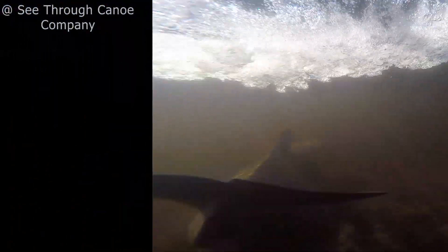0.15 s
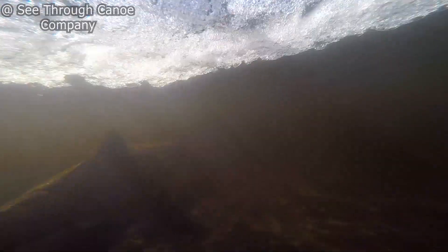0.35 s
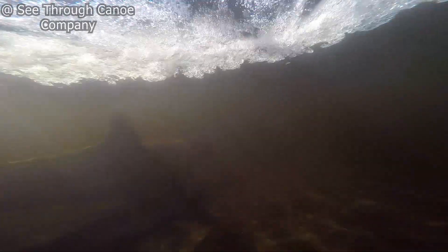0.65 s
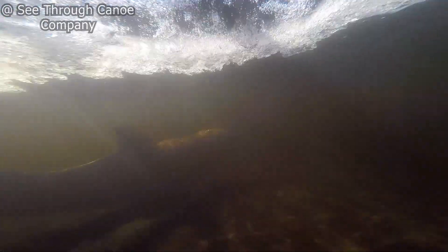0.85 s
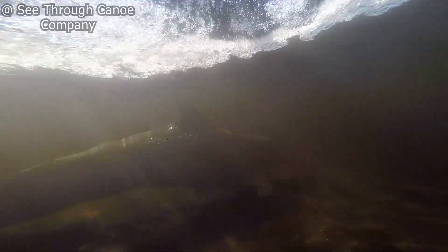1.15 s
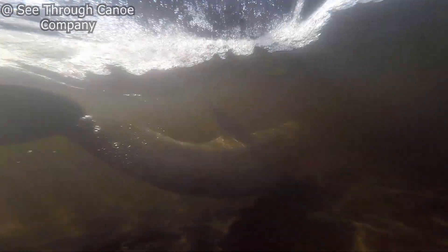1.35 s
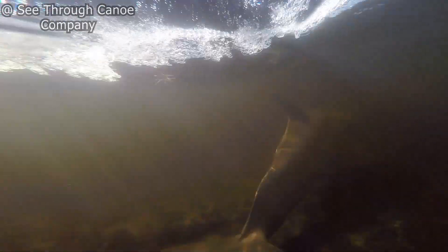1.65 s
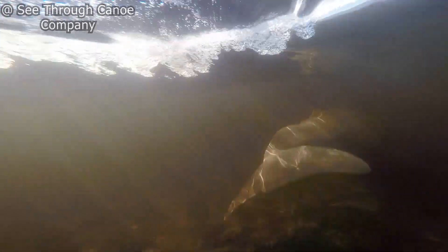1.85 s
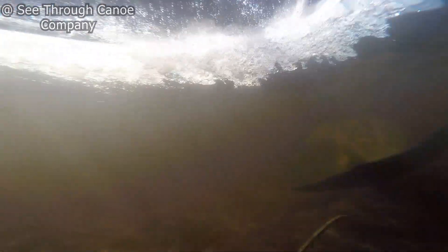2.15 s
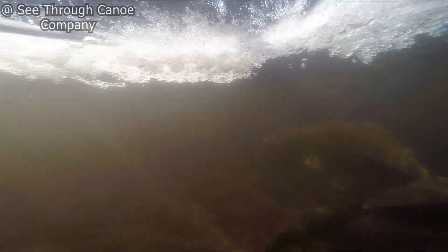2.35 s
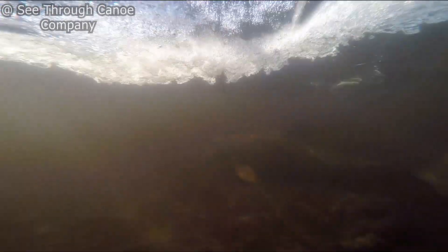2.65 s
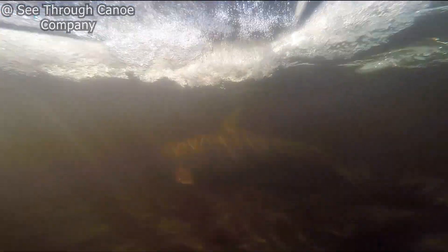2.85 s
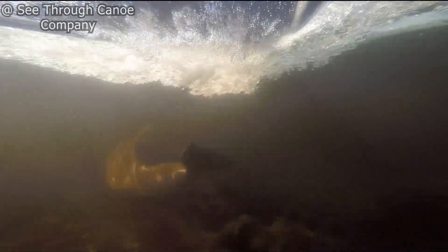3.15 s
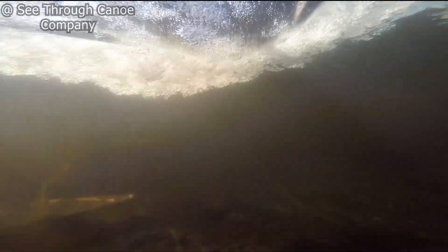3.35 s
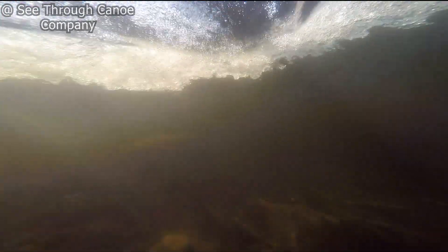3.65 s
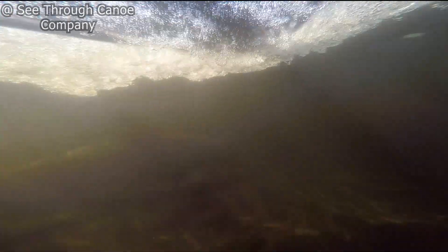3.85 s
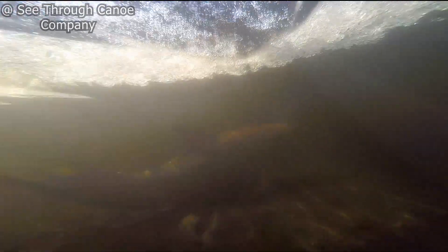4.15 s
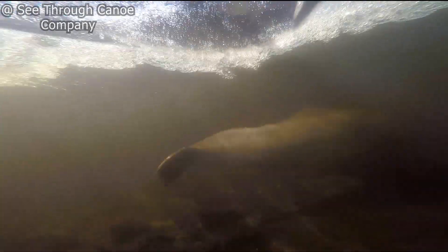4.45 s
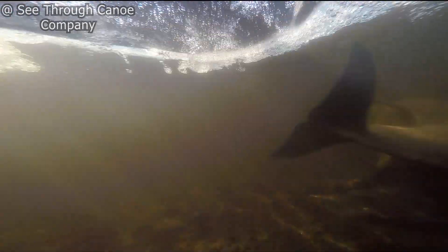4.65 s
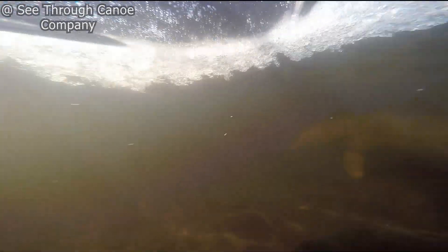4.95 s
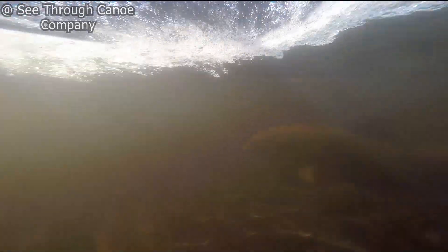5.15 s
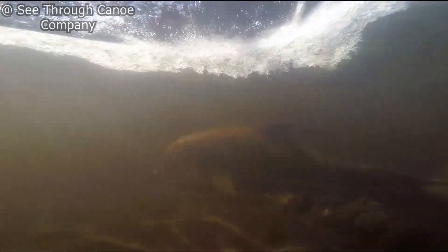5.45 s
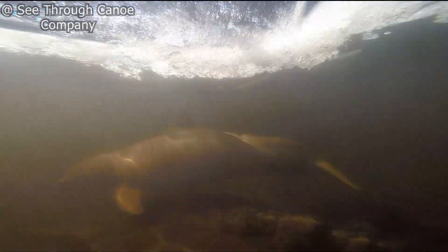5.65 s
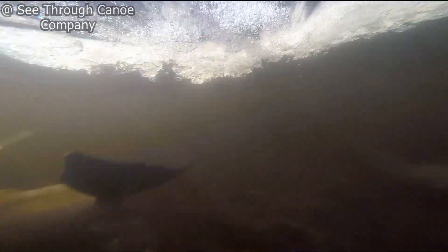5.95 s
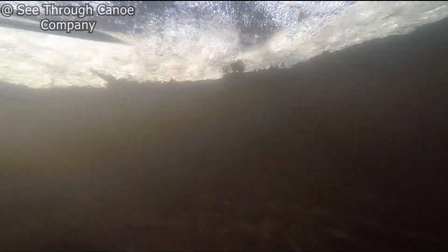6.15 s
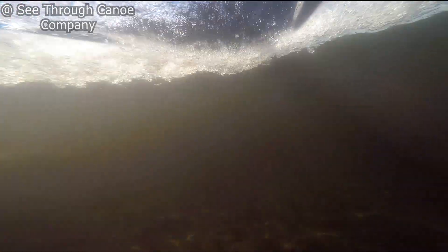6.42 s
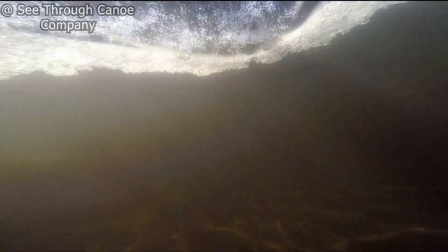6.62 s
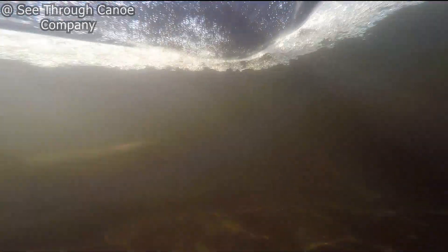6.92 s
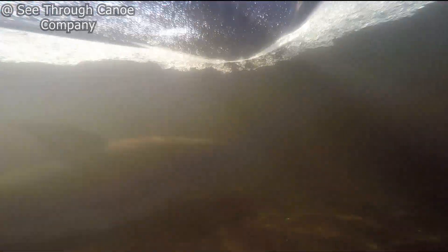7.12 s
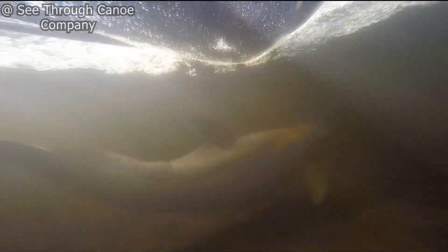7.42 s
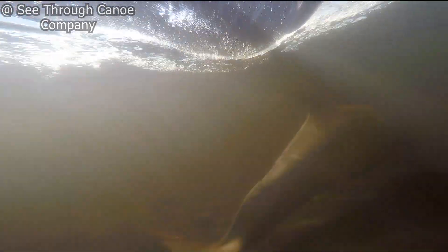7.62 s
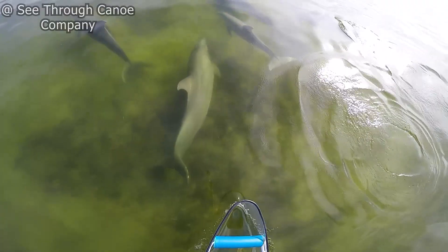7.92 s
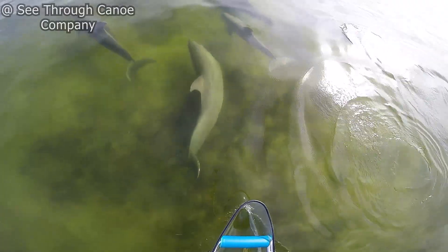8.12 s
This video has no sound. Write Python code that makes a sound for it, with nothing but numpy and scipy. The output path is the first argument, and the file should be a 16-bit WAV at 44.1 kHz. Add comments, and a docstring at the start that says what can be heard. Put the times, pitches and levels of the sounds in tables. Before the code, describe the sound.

Water rushes and bubbles loudly past an underwater hull, with deep drumming, faint gliding dolphin whistles and sharp clicks, then abruptly quiet wind and hiss.

```python
"""Under a moving hull, water rushes past a hard housing: flow drums on it and foam streams by.
Bubbles are short fading tones that ring the housing; rumble and hiss are filtered noise.
Dolphins whistle in gliding tones and snap in sharp clicks.
A moment of the same water at half speed comes first; wind and hiss above the water come last."""
import sys
import numpy as np
from scipy import signal
from scipy.fft import rfft, irfft, next_fast_len
from scipy.io import wavfile
from scipy.ndimage import uniform_filter1d, minimum_filter1d, map_coordinates

SR = 44100
rng = np.random.default_rng(int(sys.argv[2]) if len(sys.argv) > 2 else 0)


def waveform_to_disk(signal):
    """Save audio, clipped to [-1, 1], as 16-bit WAV at the path in sys.argv[1]."""
    frames = np.transpose(np.atleast_2d(signal))
    scaled = np.clip(frames, -1, 1) * 32767
    samples = np.round(scaled).astype(np.int16)
    wavfile.write(sys.argv[1], SR, samples)


N = 365139

UNDER_START_S, UNDER_END_S = 0.252, 7.854  # the full-speed underwater part
TOP_HZ = 16500  # nothing above this pitch is kept
RUMBLE_DB = -13  # reference level for rumble and throb
THROB_HZ = 54.76  # the mount shakes around this pitch
SWELL_S, SWELL_DB = 0.072, 12  # width and height of a swell in the throb's octave
SURGE_RISE_S, CALM_DB = 0.016, -45.5  # how fast a foam sheet arrives; the fizz between sheets
GLIDE_LOSS_DB = 1.2  # whistle loss, times the square of its glide in 50 kHz a second
WAVER = 0.003  # unsteadiness of whistle pitch, as a share
ECHO_S, ECHO_DB = 0.006, -8  # the whistles' answer from the surface

# Gurgle of the water. Each row: time in seconds, level in dB before the clumps.
GURGLE_LEVEL = [(0.35, -26), (0.8, -24), (1.8, -22.5), (2.3, -25), (3.1, -24.5), (3.5, -27), (4.6, -22),
                (5.2, -26), (5.7, -23.5), (7.2, -24.5), (7.6, -26), (7.8, -18.5)]
# Overtones of the shaking mount. Each row: multiple of the throb pitch, level in dB over RUMBLE_DB.
THROB_ORDERS = [(1, -5), (2, -14.5), (3, -24)]
# Brief swells of the throb's octave. Each entry: time in seconds.
OCTAVE_SWELLS = [1.84, 3.5, 3.72, 4.57, 6.1, 7.82]
# Sheets of bow foam. Each row: start in seconds, fizz level in dB, thinning in dB per second.
SURGES = [(-0.1, -28.5, 16), (0.55, -23.5, 19), (0.75, -22.5, 19), (1.19, -25.5, 24), (1.5, -26, 17),
          (2.152, -25, 80), (2.831, -29, 9.5), (3.72, -31, 29), (4.219, -27, 17.5), (5.28, -37.5, 4),
          (5.604, -26.5, 41.5), (6.235, -25.5, 9), (6.82, -25.5, 48), (7.3, -29, 47), (7.68, -36, 12)]
# Bubbles breaking up. Each row: start in seconds, base level in dB, ring pitch in Hz.
BURSTS = [(0.3344, -4.5, 2200), (0.562, 3, 2380), (0.662, -4, 2060), (0.7502, -6, 2050), (0.8695, -4, 2180),
          (0.978, -18, 2090), (1.196, -9.5, 1990), (1.2828, -6, 2080), (1.36, -11, 1950), (1.752, -8, 2140),
          (1.896, -4.5, 2240), (1.9471, -7, 2760), (1.955, 1, 1920), (2.025, -3, 2060), (2.107, -12, 1920),
          (2.193, -13, 2230), (2.4802, -13.5, 2170), (2.8791, -1.5, 1490), (2.906, -2, 1900),
          (3.049, -7, 1860), (3.302, -9.5, 2040), (3.453, -15.5, 1900), (3.8168, -11, 2220),
          (4.2536, 6, 1840), (4.286, -6, 2100), (4.336, -7.5, 3250), (4.37, -5.5, 3670), (4.4243, -9, 2030),
          (4.574, -3, 1740), (5.066, -14.5, 2620), (5.6216, -6, 2350), (5.933, -13, 2380),
          (6.324, -8, 1960), (6.431, 7.5, 1830), (6.6088, -7, 1980), (6.8313, -10, 2100),
          (7.0768, -12, 3310), (7.487, -13.5, 4300), (7.629, -15.5, 2540)]
# Bubbles breaking up at half speed. Each row: start in seconds, level in dB.
SLOW_BURSTS = [(0.008, -2), (0.11, -9)]
# Big bubbles. Each row: start in seconds, base level in dB.
PLOPS = [(0.649, -10.5), (0.752, -9.5), (0.86, -6.5), (1.941, -11.5), (3.168, -1.5), (4.523, -2.5),
         (4.571, -7.5), (5.62, -7.5), (6.428, -2.5), (6.608, -10.5), (7.7, -12)]
# Large pockets of air. Each row: start in seconds, level in dB.
GULPS = [(1.882, -4.5), (1.912, -6), (3.982, -8.5), (7.8, -5.5)]
# Large pockets of air at half speed. Each row: start in seconds, level in dB.
SLOW_GULPS = [(0.071, -12.5), (0.19, -14)]
# Dolphin whistles. Each row: base level in dB, list of pitch points (time in seconds, pitch in Hz).
WHISTLES = [ (-56, [(0.955, 8700), (1.045, 11950), (1.145, 12550), (1.185, 11560), (1.205, 8800),
            (1.23, 8000)]), (-49.5, [(1.325, 8450), (1.342, 9000), (1.4, 10080), (1.58, 10800)]),
            (-63, [(3.83, 12300), (3.88, 11900), (3.94, 12900), (4.0, 12400), (4.05, 10300), (4.08, 8250)]),
            (-58.5, [(4.14, 7400), (4.18, 8800), (4.29, 11050), (4.4, 10900), (4.45, 8400), (4.49, 7600)]),
            (-61, [(4.55, 7700), (4.58, 9050), (4.63, 8950), (4.69, 10000), (4.72, 12060), (4.83, 9000)]),
            (-54.5, [(5.578, 7340), (5.6, 9100), (5.65, 10500), (5.72, 12720), (5.75, 12900),
            (5.795, 12100), (5.825, 6900), (5.89, 6080)]), (-59.5, [(5.92, 7400), (5.97, 7960),
            (6.005, 10500), (6.11, 12000), (6.15, 13090), (6.17, 12700), (6.19, 8900), (6.25, 7280)]),
            (-54, [(6.33, 7240), (6.43, 9800), (6.5, 10500), (6.55, 12700), (6.568, 11800), (6.575, 8860),
            (6.62, 7500)]), ]
# How the housing passes whistles. Each row: pitch in Hz, gain in dB.
WHISTLE_COLOUR = [(6300, -12), (7900, 4), (9000, 7), (10300, -4), (11100, -5), (12600, 7)]
# Dolphin snaps. Each row: start in seconds, base level in dB, pitch in Hz.
SNAPS = [(0.581, -29, 6000), (0.618, -21.5, 5300), (0.8066, -19.5, 5800), (1.949, -17, 6400),
         (2.015, -20, 5650), (3.318, -30.5, 6370), (3.753, -22, 5400), (3.782, -16.5, 7200),
         (4.78, -4.5, 10460), (5.246, -28, 7960), (7.0918, -9.5, 5730), (7.0987, -6, 11300),
         (7.492, -21, 7400)]
# Wind and hiss above the water. Each row: time in seconds, wind level in dB, hiss level in dB.
ABOVE_LEVEL = [(7.87, -35, -54.5), (7.95, -26, -52), (8.02, -35, -50), (8.09, -30.5, -39.5),
               (8.28, -31, -42)]

# The next six tables are tone colours.
# Low drumming of the flow. Each row: frequency in Hz, relative strength in dB.
RUMBLE = [(18, -3), (59, 2), (112, -9.5), (194, -22), (300, -29.5), (600, -100)]
# The housing's low modes. Each row: frequency in Hz, relative strength in dB.
GURGLE = [(150, -39), (230, -10), (323, -9.5), (430, 0.5), (500, -5), (590, 1), (768, -14.5), (926, -12.5),
          (1120, -23), (1700, -59.5)]
# The housing's bright modes. Each row: frequency in Hz, relative strength in dB.
FIZZ = [(700, -44), (1120, -10), (1470, -3), (1630, -9.5), (2000, 1), (2500, -3.5), (3390, -13.5),
        (3700, -10.5), (4140, -16), (5100, -18.5), (6000, -33.5), (9000, -65.5)]
# The finest bubbles. Each row: frequency in Hz, relative strength in dB.
CRACKLE = [(4500, -18.5), (6000, 0), (9000, -5.5), (15000, -14), (16500, -39)]
# Wind on the port. Each row: frequency in Hz, relative strength in dB.
WIND = [(18, -4), (70, -6.5), (108, -37), (160, -12), (300, -35.5), (700, -67)]
# Hiss in the case's resonances. Each row: frequency in Hz, relative strength in dB.
CASE_HISS = [(300, -36), (980, -23), (1120, -6), (1280, -15), (1630, -43.5), (1850, -23), (2400, -30),
             (2950, -47), (3150, -30), (3300, -39), (9000, -74)]


def amp(db):
    """Turn decibels into gain."""
    return 10 ** (np.asarray(db) / 20)


def unit(x):
    """Scale a sound to an average (rms) strength of 1."""
    return x / np.sqrt(np.mean(x ** 2) + 1e-20)


def curves(rows):
    """Join the points of each column after the time into one value per sample."""
    s, *cols = np.transpose(rows)
    return [np.interp(np.arange(N) / SR, s, c) for c in cols]


def wobble(rate):
    """Draw a smooth random curve through `rate` random points a second."""
    points = rng.standard_normal(int(N * rate / SR) + 4)
    return map_coordinates(points, [np.arange(N) * rate / SR])


def coloured(x, points):
    """Filter x to a tone colour, with each response starting promptly (minimum phase)."""
    m = 2 * next_fast_len(N // 2 + 8192)
    f, db = np.transpose(points)
    gain = amp(np.interp(np.log(np.fft.rfftfreq(m, 1 / SR) + 1), np.log(f + 1), db))
    # folding the cepstrum (spectrum of the log gain) forward in time gives the minimum phase
    cepstrum = irfft(np.log(gain + 1e-6), m)
    cepstrum[1:m // 2] *= 2
    cepstrum[m // 2 + 1:] = 0
    return irfft(rfft(x, m) * np.exp(rfft(cepstrum)), m)[:N]


def rings(s, hz, cycles, gain, size, onset=0.11):
    """Damped tones that start softly at times s and rise a little in pitch, as bubbles do."""
    t = np.arange(size) / SR
    turns = hz[:, None] * t
    # cycles and onset are the decay and attack, counted in turns of the tone
    envelope = gain[:, None] * np.exp(-turns / cycles) * (1 - np.exp(-turns / onset))
    wave = envelope * np.sin(2 * np.pi * turns * (1 + 0.002 * turns))
    faded = wave * np.cos(np.pi / 2 * t / t[-1])  # reaches zero at the last sample
    at = (s * SR).astype(int)[:, None] + np.arange(size)
    return np.bincount(at.ravel(), faded.ravel(), N + size)[:N]


def rattle(s, db, life):
    """Short puffs of noise at times s that die away with time constant life, in seconds."""
    t = np.arange(1500) / SR
    at = (s * SR).astype(int)[:, None] + np.arange(len(t))
    noise = rng.standard_normal((len(s), len(t)))
    puffs = amp(db)[:, None] * noise * np.exp(-t / life)
    return np.bincount(at.ravel(), puffs.ravel(), N)


def flow():
    """Flow drums on the housing and shakes its mount, while foam streams by in clumps."""
    fizz_db, clump = foam_level(), wobble(14)
    gurgle_db = curves(GURGLE_LEVEL)[0] + 1.74 * clump
    crackle_db = -59.0 + 0.58 * (fizz_db + 33.0)  # the finest bubbles follow the foam
    gurgle = amp(gurgle_db) * foam(GURGLE, 5.7, 2.3, 1, count=2500, size=1200)
    fizz_gain = amp(fizz_db + 1.6 * clump + 2.04 * wobble(30))
    fizz = fizz_gain * foam(FIZZ, 7.8, 3.3, -6, count=5000, size=500)
    crackle_gain = amp(crackle_db + clump + 3.0 * wobble(40))
    crackle = crackle_gain * foam(CRACKLE, 7.5, 4.9, -8.0, count=5500, size=120)
    bright = fizz + crackle + blips(fizz_db + 2 * clump)
    return np.array([rumble(clump) + throb(), gurgle, bright])


def rumble(clump):
    """Turbulence drums on the housing: low noise that grows and fades with the clumps."""
    noise = unit(coloured(rng.standard_normal(N), RUMBLE))
    return amp(RUMBLE_DB - 2.0 + 1.2 * clump) * noise


def throb():
    """The mount shakes at a wavering pitch and its multiples; the octave swells at times."""
    t, out = np.arange(N) / SR, np.zeros(N)
    phase = 2 * np.pi * np.cumsum(THROB_HZ * (1 + 0.02443 * wobble(7))) / SR
    swell_db = SWELL_DB * sum(np.exp(-((t - s) / SWELL_S) ** 2) for s in OCTAVE_SWELLS)
    for multiple, db in THROB_ORDERS:
        extra_db = (multiple == 2) * swell_db + 2.74 * wobble(6)
        out += amp(RUMBLE_DB + db + extra_db) * np.sin(multiple * phase)
    return out


def foam_level():
    """Sheets of foam arrive fast, then thin; their power adds to the calm fizz (result in dB)."""
    s, db, thinning = np.transpose(SURGES)[:, :, None]
    at = np.arange(0, N, 64)  # every 64th sample is enough
    age = np.clip(at / SR - s, 0, None)
    power = (amp(db - thinning * age) * (1 - np.exp(-age / SURGE_RISE_S))) ** 2
    level = 10 * np.log10(amp(CALM_DB) ** 2 + power.sum(axis=0))
    return np.interp(np.arange(N), at, level)


def foam(spectrum, cycles, spread_db, hiss_db, count, size):
    """Bubbles of many sizes, a few far louder than the rest, over a hiss of tiny ones; rms 1."""
    u = rng.random((count, 3))
    lo, hi = spectrum[1][0], spectrum[-2][0]
    hz = lo * (hi / lo) ** u[:, 1]
    size_db = -spread_db * np.log(u[:, 2] + 0.009)
    # gain grows with pitch so that the swarm is white before the housing colours it
    swarm = rings(u[:, 0] * N / SR, hz, cycles, hz * amp(size_db), size)
    hiss = rng.standard_normal(N)
    return unit(unit(coloured(swarm, spectrum)) + amp(hiss_db) * unit(coloured(hiss, spectrum)))


def blips(fizz_db):
    """Middling bubbles in the foam ring the housing's bright mode one by one."""
    u = rng.random((600, 2))
    hz = 2130 * np.exp(0.115 * rng.standard_normal(600))
    db = fizz_db[(u[:, 0] * N).astype(int)] + 2 - 4 * np.log(u[:, 1] + 0.017)
    return rings(u[:, 0] * N / SR, hz, 7.2, amp(db), size=800, onset=0.99)


def bursts():
    """A bubble breaks up: one clear ring, and a rattle that sounds the housing's bright modes."""
    s, db, hz = np.transpose(BURSTS)
    ring = rings(s, hz, 4.64, amp(db), size=700, onset=0.52)
    return ring + coloured(rattle(s, db + 2.0, 0.0054), FIZZ)


def plops():
    """A big bubble pops, rings in the housing's low mode and shakes its neighbours."""
    s, db = np.transpose(PLOPS)
    hz = 590 * (1 + 0.029 * rng.standard_normal(len(s)))
    pop = rings(s, 1.486 * hz, 3.2, amp(db - 2), size=500)
    low_ring = rings(s, hz, 4.35, amp(db + 3.0), size=1500)
    neighbours = coloured(rattle(s, db + 11.5, 0.0016), GURGLE)
    return pop + low_ring + neighbours


def gulps():
    """A large pocket of air rolls over the housing: its low mode swells and rings long."""
    s, db = np.transpose(GULPS)
    return rings(s, np.full(len(s), 590.), 6.1, amp(db), size=2500, onset=0.88)


def whistles():
    """Dolphins' gliding tones with a flutter, soft ends and a close echo, fainter in fast glides."""
    t, out = np.arange(N) / SR, np.zeros(N)
    waver = 1 + WAVER * wobble(90)
    for db, contour in WHISTLES:
        start, end = contour[0][0], contour[-1][0]
        hz = uniform_filter1d(curves(contour)[0], size=600)
        glide = np.abs(np.gradient(hz)) * SR / 50000  # in 50 kHz a second
        soft_ends = np.clip(np.minimum((t - start) / 0.02, (end - t) / 0.012), 0, 1)
        colour_db = np.interp(hz, *np.transpose(WHISTLE_COLOUR))
        gain = soft_ends * amp(db + colour_db - GLIDE_LOSS_DB * glide ** 2)
        out += gain * np.sin(2 * np.pi * np.cumsum(hz * waver) / SR)
    direct = out * amp(3.5 * wobble(45))
    echo = np.roll(out, int(ECHO_S * SR)) * amp(ECHO_DB + 3.5 * wobble(45))
    return direct + echo


def snaps():
    """Dolphins' sharp clicks, each with two weaker echoes off hull and surface."""
    s, db, hz = np.transpose(SNAPS)
    out = rings(s, hz, 3.3, amp(db + 3), size=200)
    out += rings(s, np.full(len(s), 12500.), 0.5, amp(db + 3), size=40)  # sharp edge
    for lag, echo_db in [(0.002, 0), (0.005, -5)]:  # seconds before scatter, dB
        scatter = rng.random((len(s), 2))
        echo_s = s + lag * (0.68 + 1.2 * scatter[:, 0])
        echo_hz = hz * (0.88 + 0.23 * scatter[:, 1])
        out += rings(echo_s, echo_hz, 3.3, amp(db + echo_db), size=200)
    return out


def half_speed_water(water):
    """Water at half speed sounds an octave lower, with slowed bursts and gulps and less treble."""
    slow = signal.resample_poly(water[:, :N // 2 + 1], 2, 1, axis=1)[:, :N]
    mix = amp([-1.5, 0.1, 1.5]) @ slow  # dB for low, gurgling and bright water
    s, db = np.transpose(SLOW_BURSTS)
    mix += rings(s, np.full(len(s), 1030.), 1.8, amp(db), size=1200)
    s, db = np.transpose(SLOW_GULPS)
    mix += rings(s, np.full(len(s), 290.), 16.0, amp(db), size=4000)
    low_pass = signal.cheby2(12, 60, 0.47 * TOP_HZ, fs=SR, output="sos")
    return signal.sosfilt(low_pass, mix)


def above_water():
    """Light wind on the port and hiss in the case's resonances, over faint circuit noise."""
    wind_db, hiss_db = curves(ABOVE_LEVEL)
    wind = amp(wind_db + 2.5 * wobble(20)) * unit(coloured(rng.standard_normal(N), WIND))
    hiss = amp(hiss_db + wobble(30)) * unit(coloured(rng.standard_normal(N), CASE_HISS))
    circuit = amp(-85) * rng.standard_normal(N)
    return wind + hiss + circuit


def scene():
    """Half-speed water, full-speed water and the air above, joined by 3 ms crossfades."""
    t = np.arange(N) / SR
    after_start = np.clip((t - UNDER_START_S) / 0.003, 0, 1)
    after_end = np.clip((t - UNDER_END_S) / 0.003, 0, 1)
    water = flow()
    under = water.sum(axis=0) + bursts() + plops() + gulps() + whistles() + snaps()
    mix = (1 - after_start) * half_speed_water(water)
    mix += (after_start - after_end) * under
    mix += after_end * above_water()
    return mix[None]


def record(dry):
    """A fast limiter holds the peaks; the top treble rolls off and stops at TOP_HZ."""
    need = np.minimum(1, 0.92 / (np.abs(dry) + 1e-9))
    held = uniform_filter1d(minimum_filter1d(need, size=401), size=401) * dry
    m = next_fast_len(N + 8192)
    hz = np.fft.rfftfreq(m, 1 / SR)
    treble = amp(-18 * np.clip((hz - 14800) / 1500, 0, 2)) * (hz < TOP_HZ)
    return irfft(rfft(held, m) * treble, m)[:, :N]


dry = scene()
out = record(dry)
waveform_to_disk(out)
```